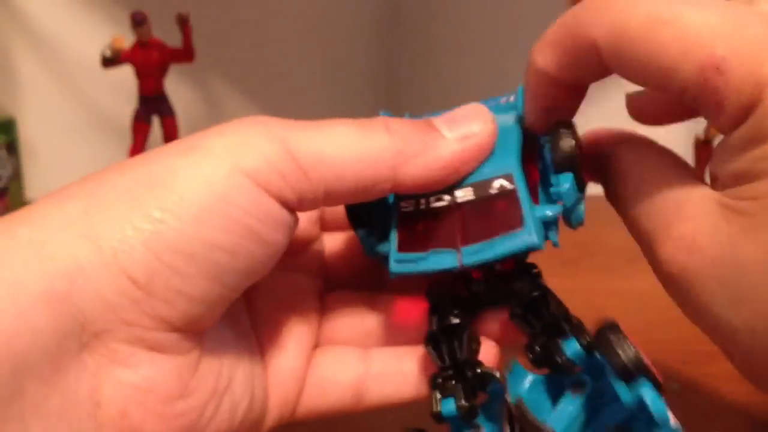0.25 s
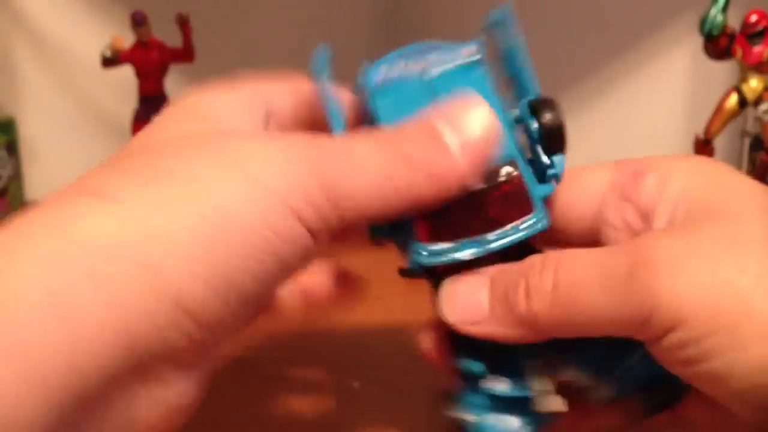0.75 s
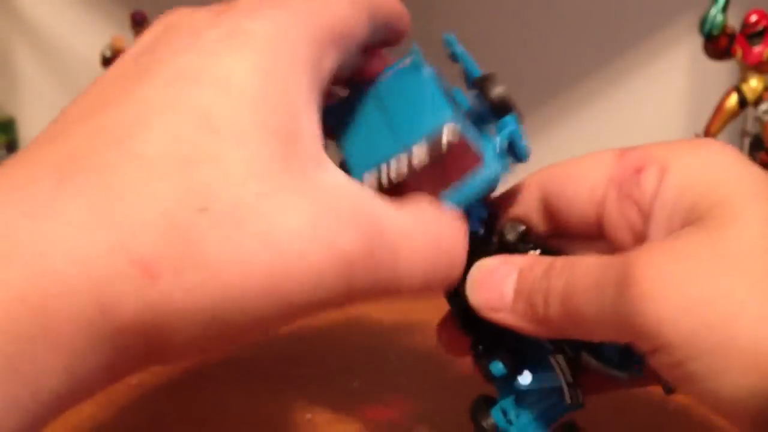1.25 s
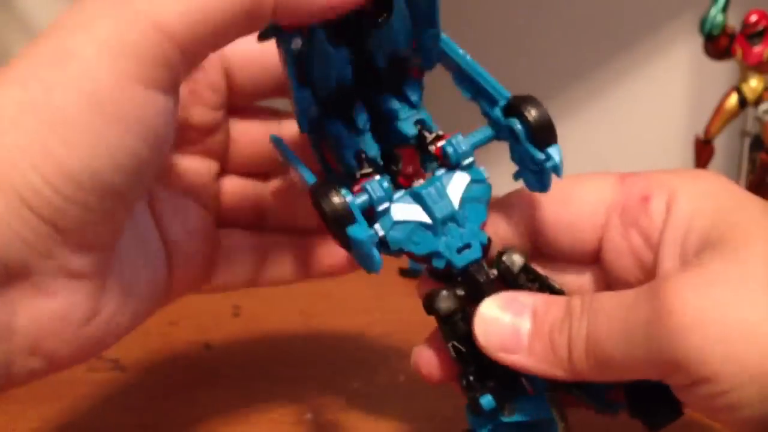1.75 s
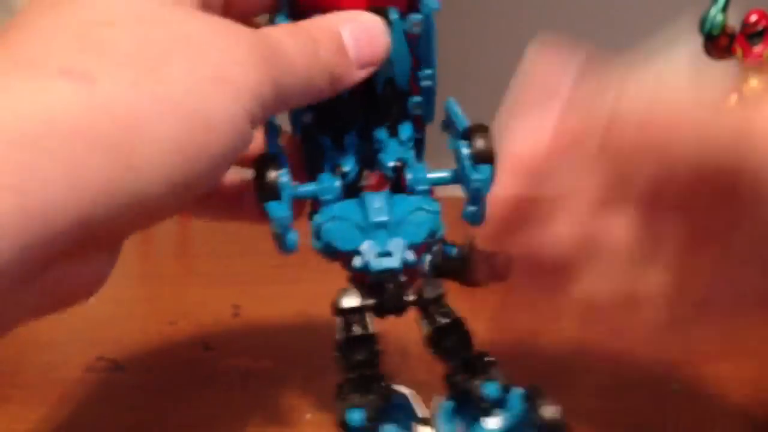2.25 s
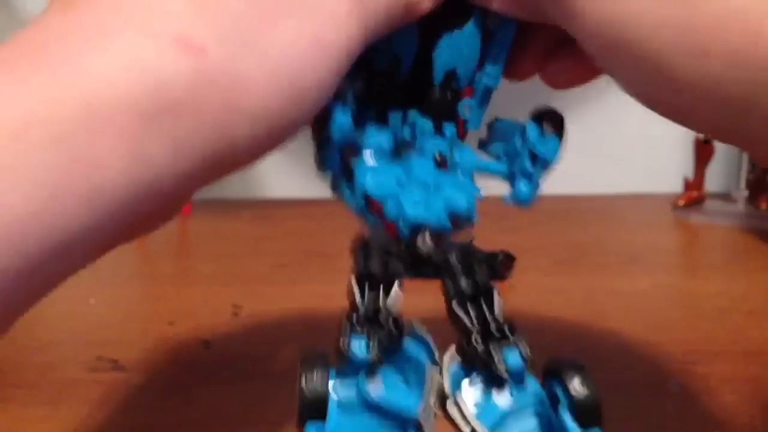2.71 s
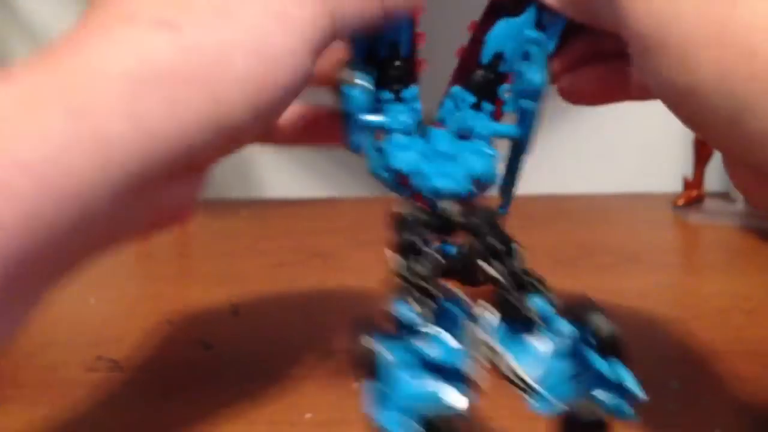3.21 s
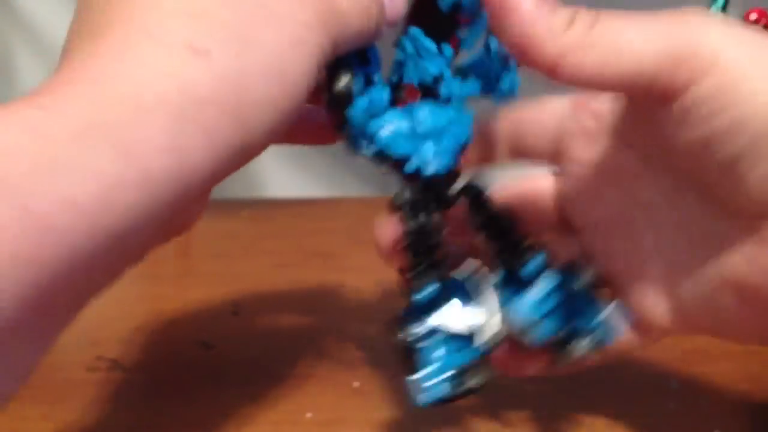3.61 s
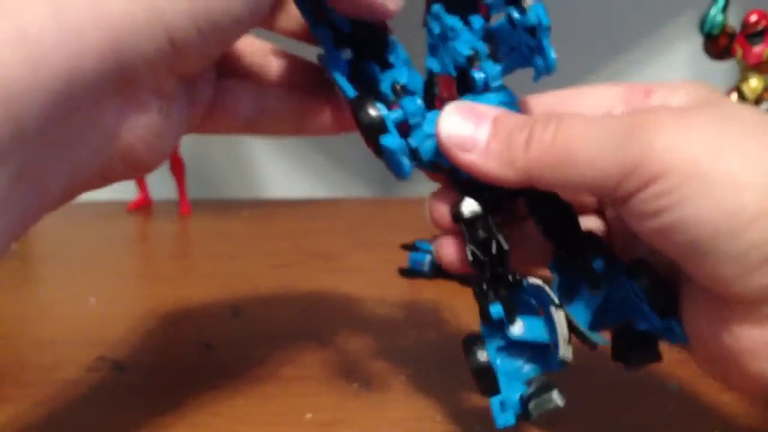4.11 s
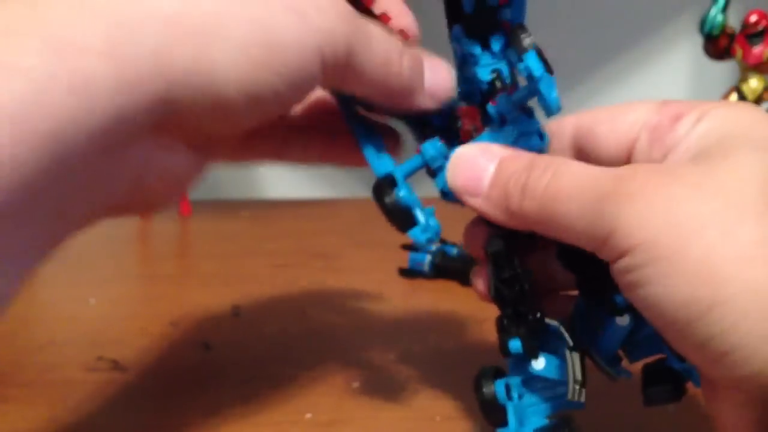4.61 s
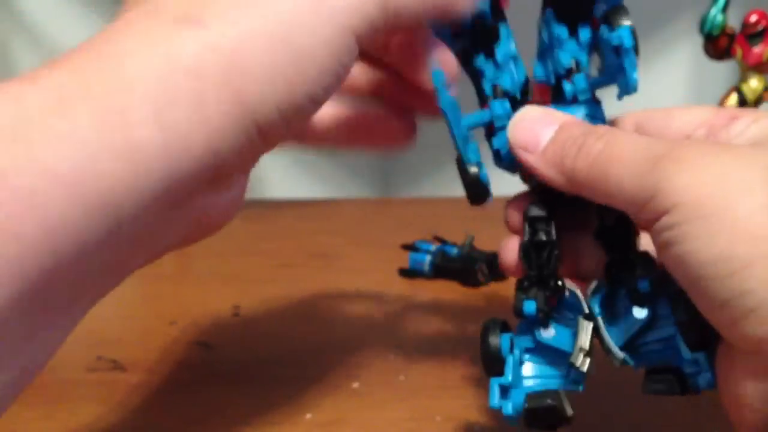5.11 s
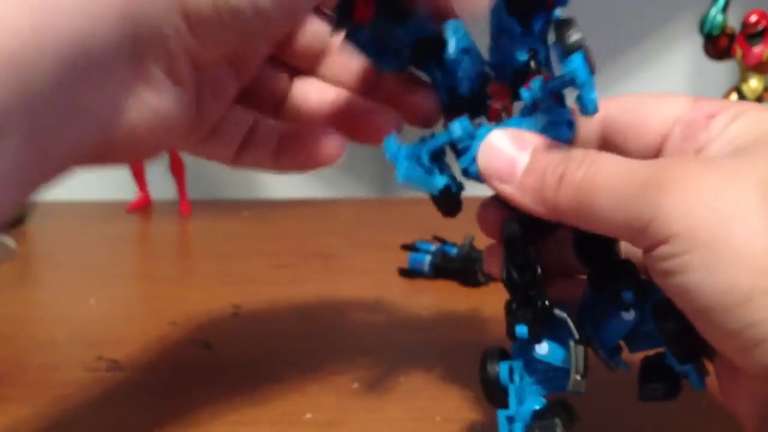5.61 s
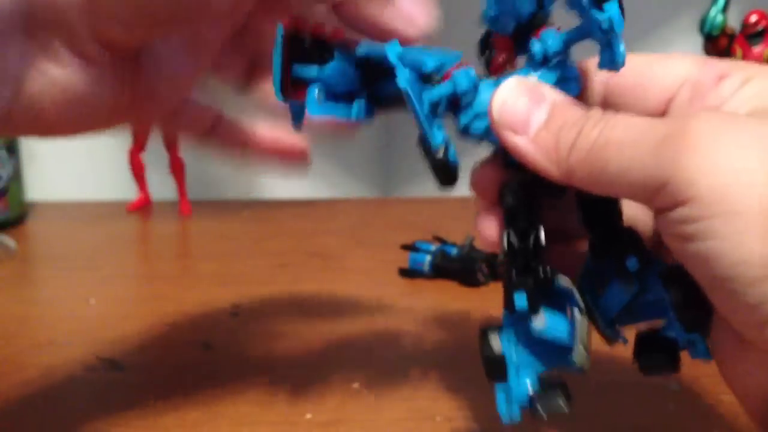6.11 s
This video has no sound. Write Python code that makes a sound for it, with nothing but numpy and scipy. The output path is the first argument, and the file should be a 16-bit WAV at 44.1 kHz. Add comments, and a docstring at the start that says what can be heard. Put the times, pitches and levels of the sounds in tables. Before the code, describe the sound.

Hands fold a jointed plastic toy close to the microphone, with sharp clicks, short rattles and scrapes, and a few knocks on a wooden desk.

```python
"""Toy figure reshaped over a desk

Hands fold a plastic toy over a wooden desk, close to a small microphone. Snaps, rattles and stick-slip
rubbing excite a set of resonances, those of the toy as picked up. Friction noise is also heard through
two narrow resonances an octave apart, probably of the microphone or its case. Feet knock and drag on
the ringing desk top. A small room adds short decaying echoes; a wavering low hum, a wandering rumble
and microphone hiss lie underneath.
"""
import sys
import numpy as np
from scipy import signal
from scipy.fft import rfft, irfft
from scipy.io import wavfile

SR = 44100
rng = np.random.default_rng(int(sys.argv[2]) if len(sys.argv) > 2 else 0)


def pcm_store(signal):
    """Save signal as 16-bit PCM."""
    levels = np.round(np.clip(np.atleast_2d(signal), -1, 1) * 32767)
    wavfile.write(sys.argv[1], SR, levels.astype(np.int16).T)


N = 280035  # length in samples

# Resonances of the toy as picked up; those near 2240 and 4490 Hz are probably the microphone's colour:
# pitch_hz, width_hz (widened in use), level_db (relative)
TOY_RESONANCES = [(797, 650, -11), (1490, 475, 0.5), (1884, 180, 4), (2239, 274, 7.5), (3330, 720, -1.5),
                  (3830, 450, 3), (4490, 420, 4), (5300, 380, 1), (5970, 1130, 4.5), (7240, 420, 9),
                  (8200, 790, 3), (10150, 990, -3), (12270, 2750, -3.5)]
FRICTION_RISE_S = 0.015  # friction sounds gain their last 20 dB in this time


def undb(db):
    """Logarithmic level: decibels to amplitude gain."""
    return 10 ** (np.asarray(db) / 20)


def level(x, db):
    """Effective value: scale a signal to an rms level in dB."""
    return x * undb(db) / np.sqrt(np.mean(x ** 2))


def curve(rows):
    """Linear interpolation: the columns of a table joined by straight lines in time."""
    s, *columns = np.transpose(rows)
    return [np.interp(np.arange(N) / SR, s, column) for column in columns]


def wander(rate):
    """Random modulation: normal random levels, rate a second, joined by straight lines."""
    knots = int(rate * N / SR) + 2
    return np.interp(np.linspace(0, knots - 1, N), np.arange(knots), rng.standard_normal(knots))


def gesture(start_s, db, rise_s, fade_s, hold_s=0):
    """Exponential growth and decay: power of a sound that swells, holds and fades."""
    t = np.arange(N) / SR - start_s
    # distance outside the hold, in steps of 20 dB
    outside = np.maximum(-t / max(rise_s, .005), (t - hold_s) / max(fade_s, .005))
    return undb(db - 20 * np.maximum(outside, 0)) ** 2


def mode(size, hz, width):
    """Damped resonator: causal frequency response of one mode, with gain 1 at its centre."""
    f = np.fft.rfftfreq(size, 1 / SR)
    return 1j * f * width / (hz ** 2 - f ** 2 + 1j * f * width)


def grit(size, share, spread_db, smooth_db=-8):
    """Stick-slip friction: a share of the samples carry small clicks over fainter noise."""
    slipping = rng.random(size) < share
    size_db = spread_db * np.minimum(rng.exponential(size=size), 4)
    return rng.standard_normal(size) * (slipping * undb(size_db) + undb(smooth_db))


def add(out, start_s, x):
    """Superposition: mix a sound in at a time."""
    i = int(start_s * SR)
    out[i:i + len(x)] += x[:N - i]


def hiss():
    """Coloured noise: random rumble with a wandering level under steady microphone hiss."""
    # Noise spectrum: pitch_hz, level_db (relative)
    spectrum = [(18, -73), (30, -28.5), (163, 4), (234, 7.5), (953, -20.5), (1200, -7), (1690, -20),
                (2310, -12.5), (2840, -10.5), (4420, -12), (5880, -12)]
    # Level of the rumble, which dips and slowly recovers: time_s, level_db
    rumble_level = [(4.4, -1), (4.6, -4), (6.35, -1)]
    rumble_hz, wander_db, total_db = 710, 3, -66
    hz, db = np.transpose(spectrum)
    f = np.fft.rfftfreq(N, 1 / SR) + 1  # the offset avoids log(0)
    noise = rfft(rng.standard_normal(N)) * undb(np.interp(np.log(f), np.log(hz), db))
    low = 1 / (1 + (f / rumble_hz) ** 2)
    rumble = irfft(noise * low, N) * undb(wander_db * wander(6.9) + curve(rumble_level)[0])
    steady = irfft(noise * (1 - low), N)
    return level(rumble + steady, total_db)


def hum():
    """Frequency and amplitude modulation: soft low tones that waver in pitch and level."""
    # Swells of the hum: start_s, hold_s, fade_s (for 20 dB, at least 0.005), level_db, pitch_hz
    swells = [(0, 0.04, .1, -64.5, 215.5), (0.017, 0.06, 0.2, -68.5, 262.5), (.73, 0.021, 0.6, -70.5, 258),
              (1.623, 0.031, 0.2, -74, 204.4), (1.778, 0.095, 0, -64.5, 221), (1.954, .07, 0.44, -67, 220)]
    rise_s, waver, flutter_db = 0.054, 0.027, 3  # waver is a fraction of the pitch
    warped_s = np.cumsum(1 + waver * wander(14.)) / SR
    flutter = undb(flutter_db * wander(24.46))
    tones = np.zeros(N)
    for start_s, hold_s, fade_s, db, hz in swells:
        amplitude = np.sqrt(2 * gesture(start_s, db, rise_s, fade_s, hold_s))
        tones += amplitude * np.sin(2 * np.pi * hz * warped_s)
    return flutter * tones


def room(x):
    """Reverberation: convolution with a short decaying cloud of echoes, duller than the direct sound."""
    t60_s, room_db, dull_above_hz = 0.17, -16, 5100
    t = np.arange(SR // 2) / SR
    echoes = rng.standard_normal(len(t)) * undb(-60 * t / t60_s) * (t > .004)
    echoes = signal.lfilter(*signal.butter(1, dull_above_hz, fs=SR), echoes)
    echoes *= undb(room_db) / np.sqrt(np.sum(echoes ** 2))
    return signal.fftconvolve(x, echoes)[:N]


def desk_response(size, rows, damping):
    """Modal superposition: the sum of the desk modes, broadened by damping."""
    response = 0
    for hz, t60_s, db in rows:
        width = damping * np.log(1000) / (np.pi * t60_s)
        response = response + undb(db) * mode(size, hz, width) / t60_s
    return response


def desk():
    """Impact and friction excitation: feet knock the desk top and drag on it in its upper modes."""
    # Desk modes: pitch_hz, t60_s (at damping 1), level_db (relative, before division by t60_s)
    desk_modes = [(234, 0.12, -13.5), (1340, 0.027, -19.5), (365, .09, 0), (571, .09, -3),
                  (469, 0.037, -16), (815, 0.017, -33)]
    # Knocks: start_s, level_db (peak for an ideal impulse), push_s (nominal), damping (1 = free)
    knocks = [(2.302, -19.5, 0.0017, 0.97), (2.331, -33.5, 0.0017, 1.1), (2.907, -38.5, 0.00033, 3.5),
              (2.953, -30, 0.0012, 3.8), (3.244, -43.5, 0.0013, 2.5), (4.051, -38, 0.0019, 1.7),
              (4.257, -37.5, 0.0018, 3), (5.637, -36.5, 0.00085, 2.3), (5.794, -44.5, 0.00056, 2.7)]
    # Dragging feet: time_s, level_db
    drag_level = [(0, -75), (1.8, -77), (2.35, -64), (2.8, -65.5), (3.3, -75), (4.02, -74.5), (4.06, -67.5),
                  (4.3, -70), (4.5, -78), (5.55, -78.5), (5.7, -73.5), (6.35, -80.5)]
    wood, size = np.zeros(N), 8192
    for start_s, peak_db, push_s, damping in knocks:
        push = np.hanning(int(np.clip(push_s, .0002, .005) * SR) + 3)
        # resting arms damp and detune the modes
        detune = 1 + .04 * (damping - 1) * rng.standard_normal(len(desk_modes))
        loaded = [(hz * d, t60_s, db) for (hz, t60_s, db), d in zip(desk_modes, detune)]
        struck = desk_response(size, loaded, max(damping, .5))
        knock = irfft(rfft(push / push.sum(), size) * struck, size)
        add(wood, start_s, undb(peak_db) * knock / np.abs(irfft(struck, size)).max())
    friction = rfft(grit(N, 0.019, spread_db=2.0))
    drag = level(irfft(friction * desk_response(N, desk_modes[1:], 11.4), N), 0)
    wood += undb(curve(drag_level)[0]) * drag
    # little of the desk is heard below about 170 Hz
    return signal.lfilter(*signal.butter(2, 170, "high", fs=SR), wood)


def narrow_bands():
    """Resonant filtering: friction noise through two narrow resonances an octave apart,
    probably of the microphone or its case."""
    # Passages where the narrow bands stand out: start_s, hold_s, level_db (lower band), pitch_hz
    passages = [(0.828, 0.027, -61, 2390), (1.881, 0.079, -65.5, 2324), (2.097, 0.038, -58, 2420),
                (2.39, 0.021, -60.5, 2290), (3.702, 0.064, -63, 2170)]
    width_hz, octave_db, fade_s = 140, -8, 0.028  # the octave is twice as wide
    push, out = rfft(rng.standard_normal(N)), np.zeros(N)
    for start_s, hold_s, db, hz in passages:
        low = level(irfft(push * mode(N, hz, width_hz) ** 2, N), 0)
        high = level(irfft(push * mode(N, 2 * hz, 2 * width_hz) ** 2, N), 0)
        power = gesture(start_s, db, FRICTION_RISE_S, fade_s, hold_s)
        out += np.sqrt(power) * (low + undb(octave_db) * high)
    return out


def rub():
    """Stick-slip through resonances: low ones when a panel slides, treble when an edge scrapes."""
    # Slides of fingers and joints: start_s, hold_s, fade_s (for 20 dB, at least 0.005),
    # level_db (middle resonances), low_db and treble_db (relative to level_db)
    slides = [(0, 0.012, -0.1, -56.5, -14, -25), (0.234, 0.03, 0.14, -53, -6, -4),
              (0.624, 0.034, 0.2, -55.5, -6.5, -3.5), (0.804, 0.031, 0.1, -54, -10, -4),
              (1.045, 0.053, 0, -55.5, -5.5, -7.5), (1.164, 0.013, 0.16, -62, -5, -8),
              (1.497, 0.074, -0.8, -62, -18, -6), (1.865, 0.086, 1.1, -65, -4, -4.5),
              (2.082, 0.051, 0.07, -56, -5.5, -2), (2.529, 0.071, 0.33, -60, -4, -8),
              (2.605, 0.021, 0, -51, -10, -7.5), (2.723, 0.0091, 0.14, -55.5, -5.5, -2.5),
              (2.955, 0.015, 0.0737, -41.5, -7.5, -5), (3.015, 0.019, 0.0567, -33.5, -14, -4.5),
              (3.293, 0.025, 0, -63, -9.5, -4), (3.419, 0.023, 0.5, -66.5, -3, -2),
              (3.75, 0.042, 0.14, -54, -7, 0.5), (3.815, 0.058, 0.05, -59, -12, -17),
              (4.503, 0.039, 0.07, -61, -10.5, -2), (4.638, 0.013, 0.15, -61, -5.5, -3),
              (4.781, 0.029, 0.2, -60, -7.5, -4), (4.966, 0.018, 0.07, -55, -5.5, -5.5),
              (5.165, 0.022, 0.11, -52, -6, -7.5), (5.639, 0.014, 0.04, -48, -8.5, -25),
              (5.759, 0.0062, 0.08, -51, -3, -8.5), (5.965, 0.031, 0.15, -58.5, -8, -3),
              (6.033, 0.034, 0.01, -53.5, -10, -0.5)]
    # Restless grip between the slides: time_s, level_db (middle resonances)
    grip_level = [(0, -65.5), (.45, -91), (1.0, -89), (1.3, -67), (1.7, -73.5), (2.3, -68), (2.8, -77),
                  (3.25, -66.5), (3.6, -73.5), (3.7, -68), (3.95, -71), (4.25, -68.5), (4.5, -76),
                  (4.8, -69), (5.08, -92), (5.36, -69), (5.45, -82), (5.9, -70), (6.35, -81.5)]
    grip_colour_db = [[-6.5], [0], [-4]]  # low, middle, treble
    power = undb(curve(grip_level)[0]) ** 2 * undb(grip_colour_db) ** 2
    for start_s, hold_s, fade_s, db, low_db, treble_db in slides:
        colour = undb([[low_db], [0], [treble_db]]) ** 2
        power = power + gesture(start_s, db, FRICTION_RISE_S, fade_s, hold_s) * colour
    push = rfft(undb(2.5 * wander(70.)) * grit(N, .005, spread_db=3.0, smooth_db=-12))
    groups = np.zeros((3, N))
    for k, (hz, width, db) in enumerate(TOY_RESONANCES):
        # the level of each resonance wanders on its own
        free = undb(db + 3.3 * wander(28.))
        ringing = irfft(push * mode(N, hz, 1.97 * width) ** 2, N)
        group = np.searchsorted([2700, 5700], hz)  # limits in Hz
        groups[group] += (-1) ** k * free * ringing
    return sum(np.sqrt(p) * level(x, 0) for p, x in zip(power, groups))


def clicks(size=8192):
    """Impulse excitation: a snap with one stressed ring, then a duller rattle over all resonances."""
    # Clicks: start_s, level_db (common to snap and rattle), ring_hz (stressed ring),
    # low_db and high_db (colour of the resonances), t60_s (rattle, at least 0.01)
    click_events = [(0.0727, -45, 3070, -49, -30, 0.29), (0.2279, -36, 3230, -3, -24, 0.1),
                    (0.2309, -22.5, 3630, -16.5, -7, 0.051), (0.237, -34, 4360, -21, -10, 0.043),
                    (0.32, -32, 3100, -16, -4, 0.06), (0.3686, -43, 2100, -8, -17, 0.066),
                    (0.618, -26, 6870, -8, -5, 0.088), (0.6235, -28, 2260, -10, -23, 0.11),
                    (0.623, -29, 4360, -16, -22, 0.13), (0.6381, -20.5, 4690, -15, 1, 0.046),
                    (0.6675, -32.5, 3830, -5, -20, 0.052), (0.7057, -43, 4760, -18, -16, 0.08),
                    (0.7165, -28.5, 4640, -7, -10, 0.053), (0.8077, -46, 4480, -19, -9, 0.4),
                    (0.8467, -26.5, 3980, -6.5, -18.5, 0.046), (1.073, -33.5, 4090, -8, -32, 0.18),
                    (1.1024, -37, 4080, -12, -32, 0.034), (1.1813, -39.5, 2470, -13, -14, 0.074),
                    (1.307, -37.5, 4760, -4, -16, 0.079), (1.449, -37, 4630, -5, -7, 0.074),
                    (1.4717, -39.5, 4160, -10, -21, 0.062), (1.4914, -27.5, 3900, -3, -11, 0.067),
                    (1.658, -43, 4270, -26, -7, 0.043), (1.835, -47, 2280, -2, -20, 0.03),
                    (2.013, -40.5, 3500, -25, -14, 0.065), (2.0927, -36, 4180, -15, -31, 0.19),
                    (2.24, -32, 2950, -11.5, -42.5, 0.036), (2.3009, -28, 2300, -38, -22, 0.19),
                    (2.309, -29, 2240, -37, -21, 0.057), (2.3073, -15.5, 6010, -5.5, -5.5, 0.069),
                    (2.331, -30, 5970, 6, -3, 0.094), (2.4137, -32.5, 4660, 0.5, -6.5, 0.065),
                    (2.535, -40.5, 4770, 3, -16, 0.11), (2.559, -38, 5030, -9, -8, 0.11),
                    (2.602, -36.5, 4130, -23, -14, 0.17), (2.7521, -26.5, 4070, -3.5, -9, 0.037),
                    (2.865, -17, 4484, -1, -14, 0.059), (2.871, -21.5, 4480, -3, 9, 0.038),
                    (2.9084, -23, 2260, 4, -12, 0.081), (2.934, -26, 4400, -8, -14, 0.089),
                    (2.947, -24, 4760, 3, -13, 0.053), (2.9566, -14, 4610, 2.5, -1, 0.0086),
                    (2.9868, -31, 7160, -26, -22, 0.056), (3.0075, -16, 4800, -1, -28, 0.06),
                    (3.011, -10.5, 2085, -7, -6.5, 0.07), (3.024, -17, 4570, -33, -3, 0.054),
                    (3.0787, -27.5, 3940, -15, -10, 0.1), (3.098, -28.5, 7100, -12.5, -14, 0.17),
                    (3.1284, -25.5, 2240, -5.5, -21, 0.09), (3.148, -32.5, 4370, -22, -7, 0.08),
                    (3.209, -41, 3460, -7, -8, 0.066), (3.301, -37, 4670, -9.5, -6, 0.053),
                    (3.4182, -42.5, 4400, -12, -10, 0.044), (3.46, -45.5, 5260, -26, -36, 0.17),
                    (3.5677, -39.5, 4320, -5, -8, 0.16), (3.579, -42, 4200, -11, 0, 0.072),
                    (3.6249, -34, 4420, -4, -3, 0.2), (3.664, -38, 3330, -15, -9, 0.13),
                    (3.6994, -30, 7400, -18, -4, 0.092), (3.725, -38.5, 4530, -24, -6, 0.079),
                    (3.7387, -40, 4320, -34, -1.5, 0.089), (3.7529, -30, 4160, -10.5, -10, 0.14),
                    (3.759, -19, 4650, -25, -3, 0.048), (3.781, -34, 5860, -22, -5, 0.03),
                    (3.8247, -36.5, 4500, -13, -8, 0.039), (3.8642, -29.5, 7000, -16, -1, 0.056),
                    (4.3204, -42, 4000, -3.5, -1, 0.038), (4.5138, -40.5, 2710, -3, -8, 0.062),
                    (4.6374, -38.5, 3280, -3, 1, 0.068), (4.651, -37.5, 3950, -11, -20.5, 0.049),
                    (4.7872, -47, 3970, -3, -1, 0.057), (4.819, -42, 4000, -6, -9, 0.03),
                    (4.8281, -37.5, 2350, -5, -12, 0.057), (4.967, -44, 4000, -13, 3, 0.058),
                    (5.156, -26, 3950, -11, -6, 0.1), (5.1633, -25, 7220, -7, -36, 0.069),
                    (5.179, -34, 3920, -22, -24, 0.045), (5.1874, -23.5, 3810, -8, -6, 0.11),
                    (5.1954, -25, 3920, -8, -10, 0.039), (5.2108, -31, 2200, -20, -15, 0.045),
                    (5.24, -32.5, 7040, -24.5, -13, 0.04), (5.37, -45.5, 4020, -15.5, -23, 0.24),
                    (5.443, -42.5, 3860, -21, -17, 0.24), (5.6279, -31, 4600, -2, 4, 0.16),
                    (5.6493, -31, 4200, 1, 16, 0.038), (5.708, -45.5, 2080, -9, -19, 0.091),
                    (5.7644, -36.5, 5170, -14, -7, 0.046), (5.7946, -29, 3520, -10.5, -9, 0.089),
                    (5.8807, -38.5, 4310, -13, -10, 0.052), (5.9601, -35.5, 4750, -1, -21, 0.071),
                    (5.978, -29, 4620, -2, 5, 0.037), (6.0214, -32.5, 4500, -31, -6, 0.02),
                    (6.046, -41, 4400, -14, 1, 0.072)]
    out, t = np.zeros(N), np.arange(size) / SR
    hz, width, db = np.transpose(TOY_RESONANCES)
    dull = mode(size, 4020, 12500)
    contact = t * np.exp(-t / 0.0005)
    contact /= np.sqrt(np.sum(contact ** 2))
    release = np.zeros(size)
    release[22] = 1  # the part lets go at the height of the contact, 0.5 ms in
    release = rfft(release)
    for start_s, click_db, ring_hz, low_db, high_db, t60_s in click_events:
        colour_db = db + np.interp(np.log(hz), np.log([2400, 4300, 8000]), [low_db, 0, high_db])
        # each click varies the level and pitch of the resonances anew
        mode_db = colour_db + 3.6 * rng.standard_normal(len(hz))
        mode_hz = hz * (1 + 0.03 * rng.standard_normal(len(hz)))
        body = sum((-1) ** k * undb(mode_db[k]) * mode(size, mode_hz[k], 1.6 * width[k]) ** 2
                   for k in range(len(hz)))
        ring = mode(size, ring_hz, ring_hz / 13) ** 2
        blow = rfft(rng.standard_normal(size) * contact)
        snap = irfft(blow * body + undb(14.5) * ring * release, size)
        snap /= np.abs(snap).max()
        chatter = rfft(grit(size, 0.013, spread_db=0.0))
        rattle = level(irfft(chatter * dull * (body + undb(6.5) * ring), size), 0)
        decay = undb(-60 * t / max(t60_s, .01))
        end_fade = np.cos(np.pi / 2 * t / t[-1])
        rattle *= (1 - np.exp(-t / 0.0003)) * decay * end_fade
        add(out, start_s, undb(click_db) * (undb(-3.0) * snap + undb(-15.5) * rattle))
    return out


def scene():
    """Superposition: toy and desk with their room echoes, over hum and hiss."""
    near = clicks() + rub() + narrow_bands() + desk()
    return (near + room(near) + hum() + hiss())[None]


def record(dry):
    """Band limitation: an elliptic low-pass cuts the top steeply."""
    top_hz = 15550
    lowpass = signal.ellip(10, .2, 80, top_hz, fs=SR, output="sos")
    return signal.sosfilt(lowpass, dry)


dry = scene()
out = record(dry)
pcm_store(out)
```